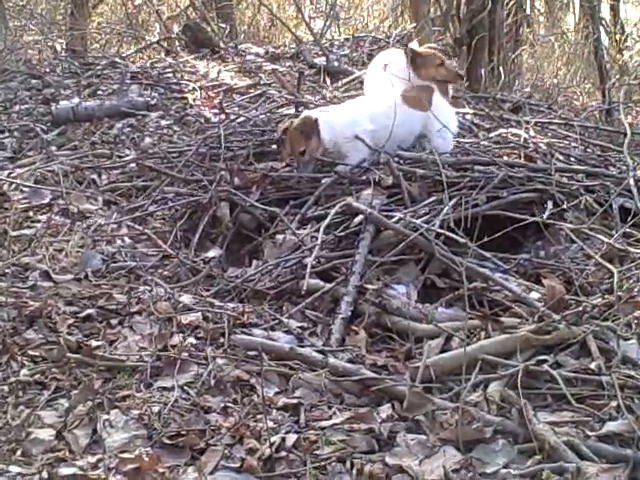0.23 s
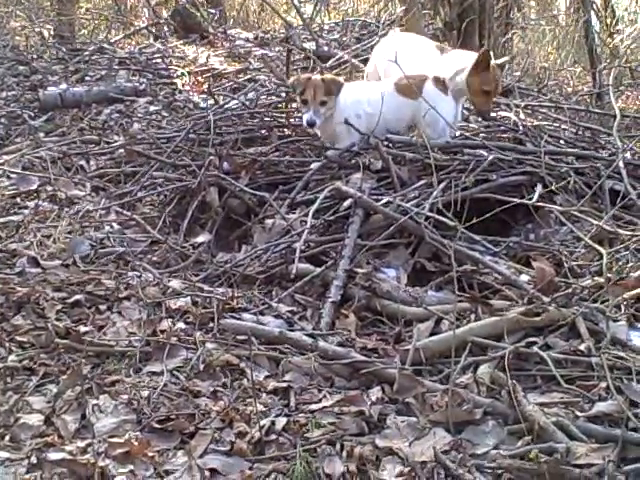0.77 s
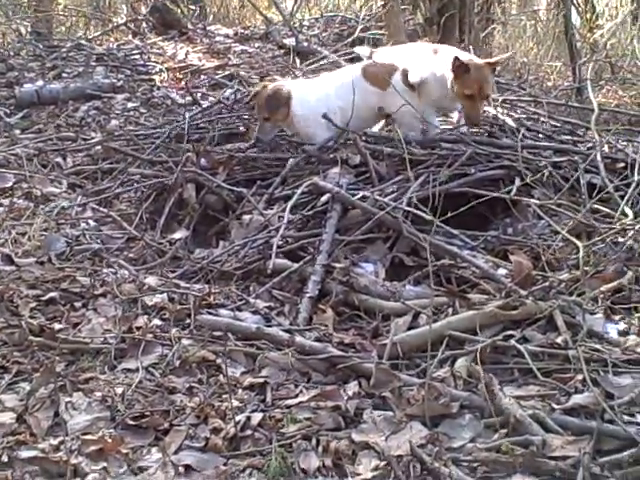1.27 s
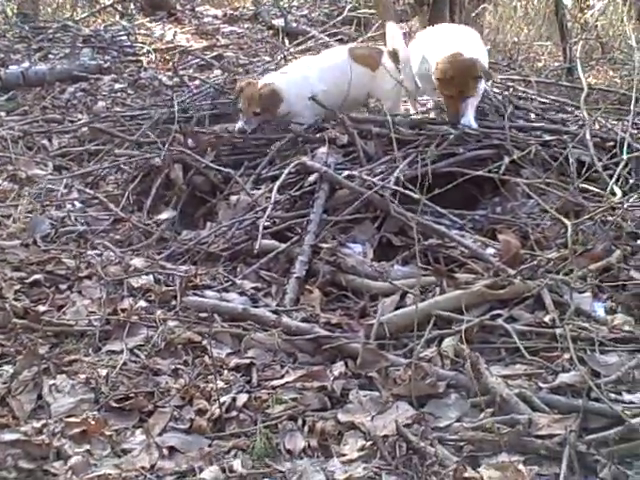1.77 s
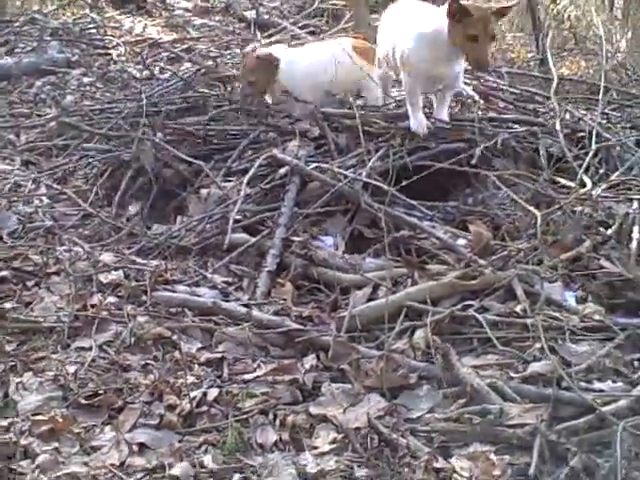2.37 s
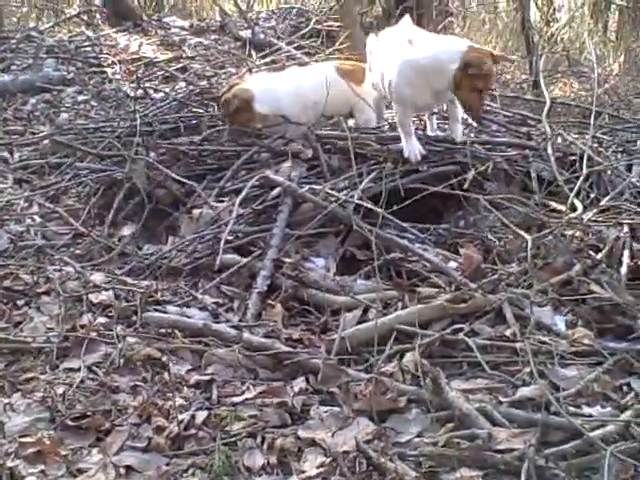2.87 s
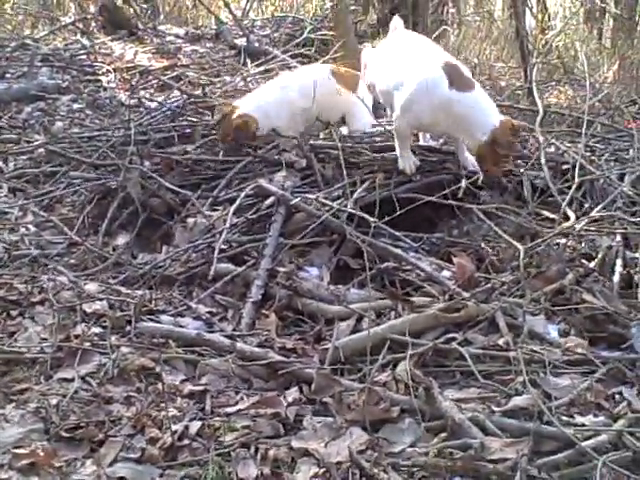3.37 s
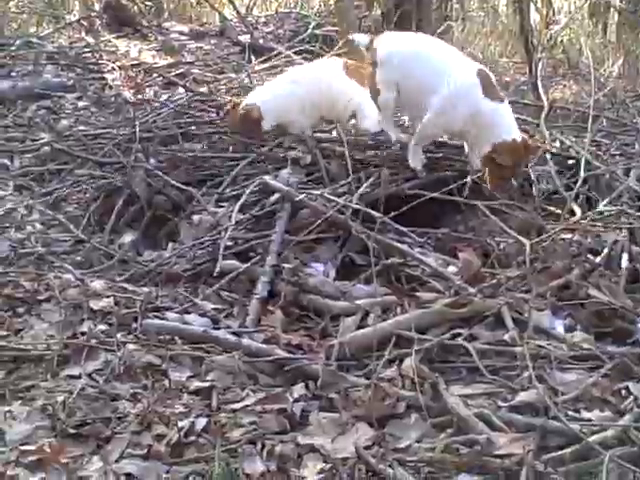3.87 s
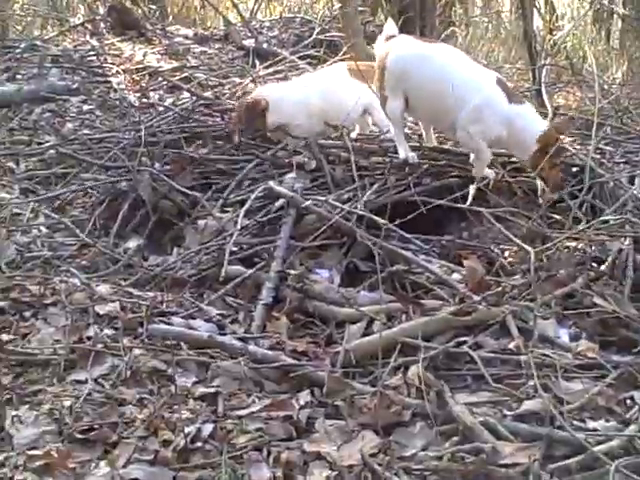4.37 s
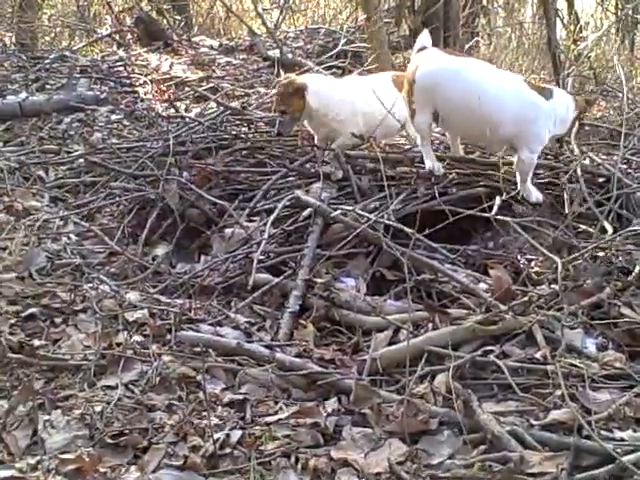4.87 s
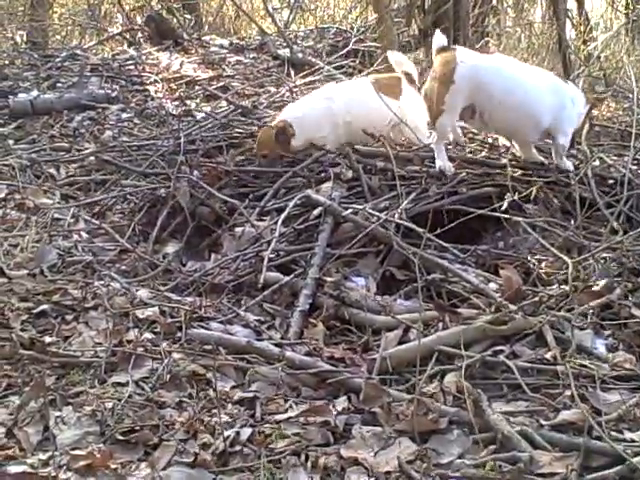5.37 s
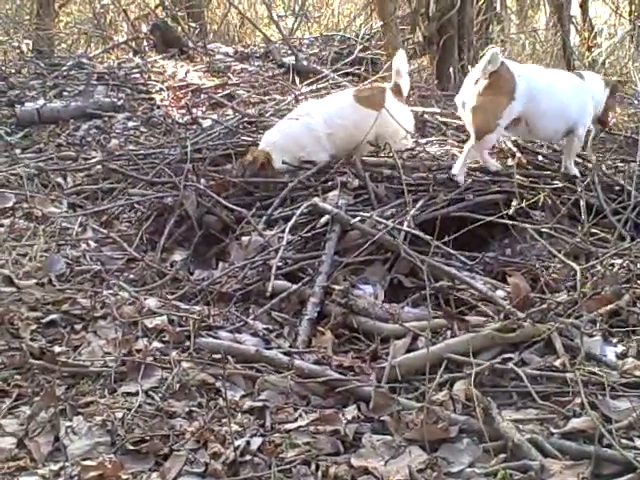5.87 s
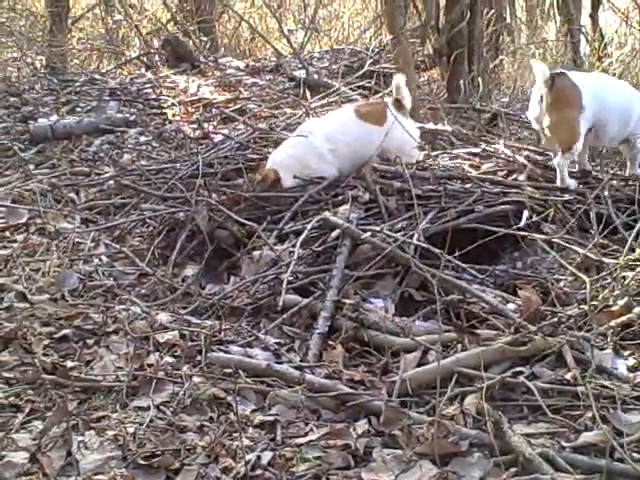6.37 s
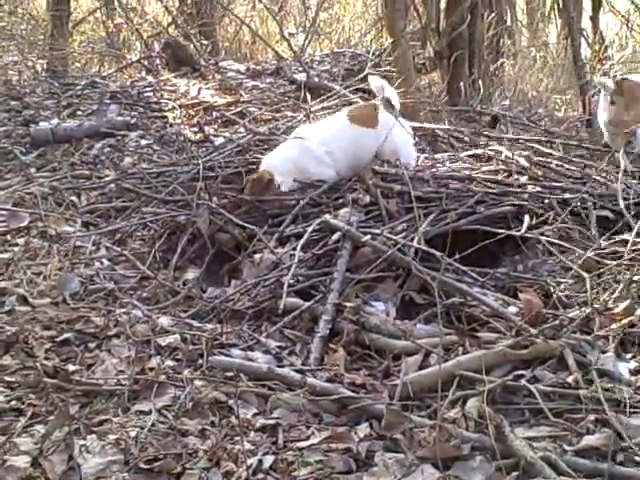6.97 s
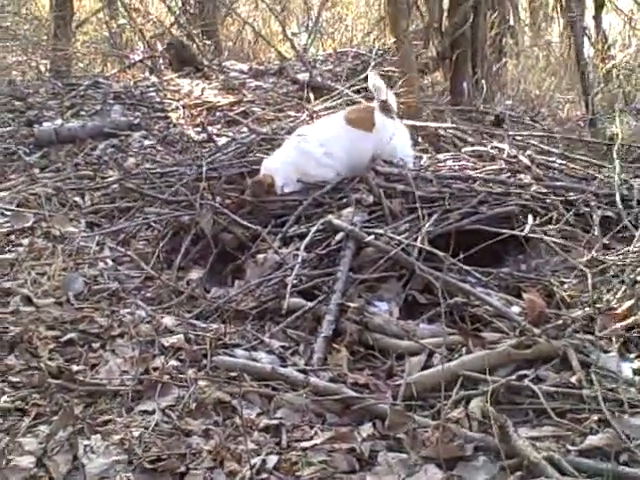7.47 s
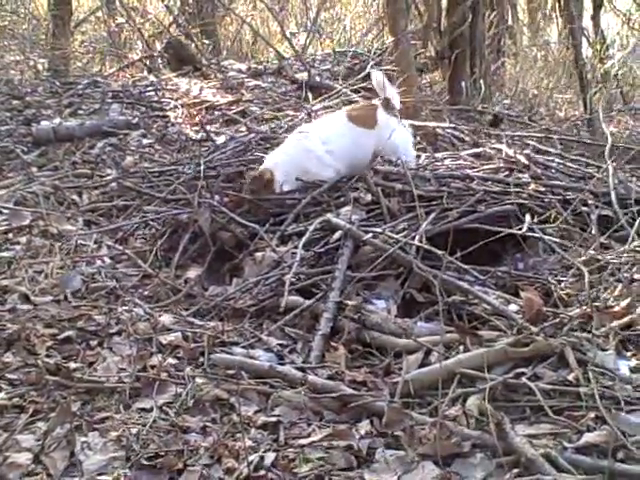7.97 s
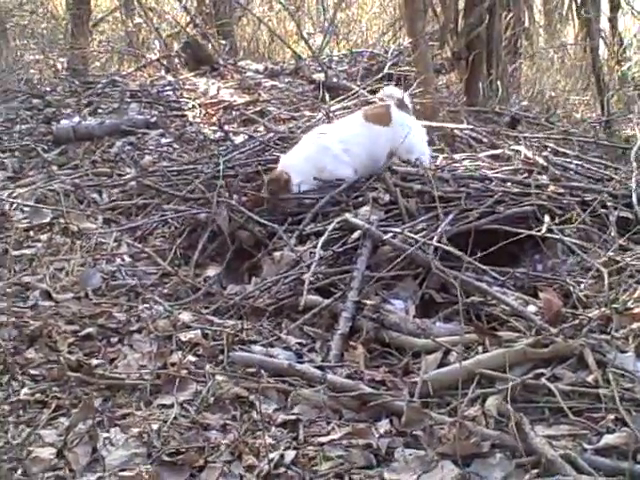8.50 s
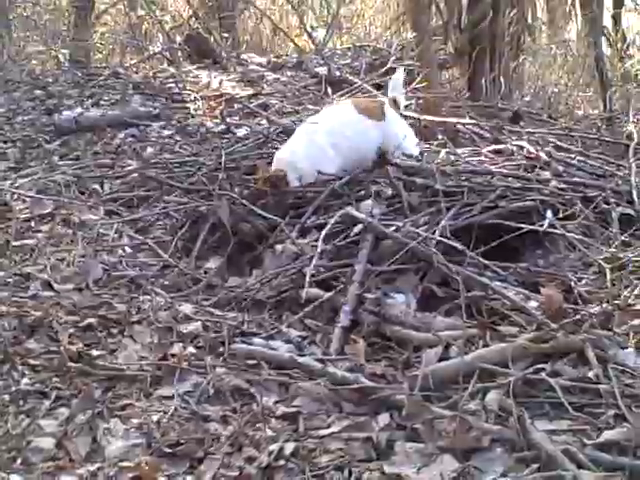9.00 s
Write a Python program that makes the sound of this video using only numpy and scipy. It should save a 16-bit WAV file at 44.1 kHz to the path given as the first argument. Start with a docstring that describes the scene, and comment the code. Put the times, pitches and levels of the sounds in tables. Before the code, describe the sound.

Dry leaves crunch and brittle twigs snap in uneven bursts as two dogs move over a woodland brush pile, above a faint distant rumble.

```python
"""In open woodland, two small dogs nose and tread through a brush pile of dry twigs and leaves.
Under their weight, leaves and stems crumple in dense tiny fractures, each a decaying burst of noise.
Twigs snap and ring briefly; thicker sticks knock in heavily damped modes. A far rumble, wavering
hums and a faint hiss lie below. A small microphone with a strong treble resonance hears it from a
few metres."""
import sys
import numpy as np
from scipy import signal
from scipy.fft import rfft, irfft
from scipy.io import wavfile
from scipy.ndimage import uniform_filter1d

SR = 44100
rng = np.random.default_rng(int(sys.argv[2]) if len(sys.argv) > 2 else 0)


def store_pcm(level_fs):
    """Save levels as 16-bit WAV."""
    pcm = np.round(np.clip(level_fs, -1, 1) * 32767).astype(np.int16)
    wavfile.write(sys.argv[1], SR, np.atleast_2d(pcm).T)


N = 407484

# Steady rustle of the leaves as both dogs shift about: t/s, level/dB
STEADY_RUSTLE = [(0.0, -32.5), (0.22, -51.5), (0.4, -44), (0.75, -46.5), (1.0, -37.5), (1.9, -43.5),
                 (2.05, -57), (2.35, -36), (2.55, -51), (2.96, -59), (3.15, -51.5), (3.4, -37), (3.85, -43),
                 (4.22, -52.5), (4.45, -44.5), (4.8, -52.5), (5.8, -36), (6.13, -42.5), (6.6, -33.5),
                 (7.36, -35.5), (7.56, -44), (8.45, -46.5), (8.9, -37.5), (9.06, -44.5), (9.24, -34)]
# A paw or nose presses into the litter: t/s at fullest weight, level/dB, press time/s, ease time/s
PAW_PRESSES = [(0.0, -29.5, 0.044, 0.036), (0.377, -29.5, 0.054, 0.086), (0.507, -33.5, 0.04, 0.034),
               (0.62, -38.5, .06, 0.13), (0.804, -38.5, 0.039, .12), (1.051, -42, 0.13, 0.039),
               (1.137, -32.5, 0.031, 0.073), (1.26, -29, 0.03, 0.031), (1.45, -25.5, 0.057, 0.14),
               (1.6, -31.5, 0.1, 0.094), (1.763, -28, 0.11, 0.078), (1.941, -33.5, 0.033, .05),
               (2.004, -29, 0.019, 0.021), (2.115, -27, 0.021, .05), (2.189, -19.5, 0.053, 0.068),
               (2.691, -40, 0.07, 0.056), (2.888, -45.5, 0.063, .03), (3.413, -38, 0.14, .025),
               (3.545, -31, 0.036, 0.2), (3.688, -29, 0.1, 0.092), (3.78, -32.5, .05, .045),
               (3.897, -23, 0.032, 0.023), (4.007, -35.5, 0.042, 0.04), (4.141, -36, 0.054, 0.047),
               (4.258, -34, 0.011, 0.38), (4.52, -24, 0.037, 0.084), (4.6, -28, 0.07, 0.038),
               (4.684, -26.5, .06, 0.037), (4.908, -40, 0.039, 0.085), (5.02, -33.5, 0.012, 0.096),
               (5.221, -39, 0.037, .07), (5.304, -33.5, .045, 0.16), (5.555, -27.5, 0.031, 0.049),
               (5.63, -26.5, 0.032, 0.035), (5.767, -29, 0.035, 0.031), (5.996, -34, 0.029, 0.034),
               (6.067, -40, 0.043, 0.065), (6.179, -31.5, 0.03, 0.05), (6.269, -33.5, 0.023, 0.021),
               (6.328, -32, 0.017, 0.084), (6.688, -24.5, 0.12, 0.059), (6.746, -31.5, 0.044, 0.023),
               (6.963, -28.5, 0.094, 0.12), (7.175, -27.5, 0.022, 0.043), (7.629, -32, 0.025, 0.037),
               (7.715, -37.5, 0.038, 0.11), (8.002, -34.5, .045, .1), (8.098, -38.5, .05, .08),
               (8.185, -35, 0.068, 0.063), (8.39, -43.5, 0.062, 0.043), (8.565, -40.5, 0.041, 0.032),
               (8.663, -47, 0.059, .1), (8.785, -30, 0.058, 0.12), (8.918, -35, 0.086, 0.073),
               (9.109, -33.5, 0.021, 0.17)]
def treading_db():
    """Incoherent sources add in power: each tread swells and eases exponentially over a steady rustle."""
    t = np.arange(N) / SR
    fall_db = 10   # over one press or ease time
    power = from_db(2 * in_time(STEADY_RUSTLE)[0])
    for peak_s, db, press_s, ease_s in PAW_PRESSES:
        from_peak = np.maximum((t - peak_s) / ease_s, (peak_s - t) / press_s)
        power += from_db(2 * (db - fall_db * from_peak))
    return 10 * np.log10(power)


def fractures(per_s, spread_db, clump_db, t60):
    """Shot process: cracks of uneven size come in random clumps; their decaying powers sum to an envelope."""
    onsets = rng.random(N) < per_s * from_db(clump_db * drift(40)) / SR
    size_db = spread_db * np.minimum(rng.exponential(1, N), 4.5)
    power = onsets * from_db(2 * size_db)
    decay = from_db(-120 / (t60 * SR))
    return np.sqrt(signal.lfilter([1], [1, -decay], power + 1e-18))


# Spectra of fracture in thin leaves and in stiffer stems: f/Hz, relative level/dB
LEAF_SPECTRUM = [(1500, -24.5), (3000, -10.5), (4000, -3.5), (6000, -0.5), (9000, 3.5)]
STEM_SPECTRUM = [(250, -28), (500, -6.5), (1000, -7), (2000, -2), (3200, -1.5), (5000, -11.5),
                 (9000, -31.5)]
# Drift of the stems about their usual share of the rustle: t/s, relative level/dB
STEM_BALANCE = [(0.0, 0.5), (0.9, 1), (1.3, -0.5), (1.9, 0.5), (2.2, -1), (2.55, 1.5), (3.4, -0.5),
                (4.0, -1.5), (4.3, -0.5), (4.7, -0.5), (5.8, 0.5), (6.2, -1), (7.0, -1), (7.2, 2),
                (7.55, -2), (8.0, 1.5), (8.2, 1.5), (8.55, -1.5), (9.24, 0)]
def litter():
    """Common excitation: the same fractures sound in leaves and stems; each also has some of its own."""
    usual_leaves_db, usual_stems_db, stems_follow = -37, -49, 0.93
    leaves_db = treading_db()
    stems_db = usual_stems_db + stems_follow * (leaves_db - usual_leaves_db) + in_time(STEM_BALANCE)[0]
    ticks = fractures(per_s=90, spread_db=3.0, clump_db=3.0, t60=0.006)
    shared = fractures(per_s=900, spread_db=3.5, clump_db=5.5, t60=0.029) + 1.95 * ticks
    in_leaves = fractures(per_s=2100, spread_db=2.0, clump_db=1.0, t60=0.018)
    in_stems = fractures(per_s=2100, spread_db=2.0, clump_db=1.0, t60=0.018)
    leaves = colour(evened(shared + 0.59 * in_leaves) * rng.standard_normal(N), LEAF_SPECTRUM)
    stems = colour(evened(shared + 0.72 * in_stems) * rng.standard_normal(N), STEM_SPECTRUM)
    return from_db(leaves_db) * heard_rms_one(leaves) + from_db(stems_db) * heard_rms_one(stems)


# Breaking twigs: t/s, peak level/dB of the crack, level/dB of the woody part re the crack, ring f/Hz
TWIG_SNAPS = [(0.2732, -14.5, -14, 6000), (0.329, -16, -10.5, 6000), (0.3872, -10.5, -17, 6000),
              (0.4124, -17, -14, 5870), (0.5159, -14.5, -14, 5100), (0.605, -20.5, -10, 4630),
              (0.9934, -14.5, -13.5, 5470), (1.107, -21, -17, 6000), (1.1607, -24, -15, 5500),
              (1.137, -21, -12, 6300), (1.3642, -16.5, -17, 6700), (1.4744, -12, -9, 6200),
              (1.5461, -15, -8, 7050), (1.6743, -8, -10.5, 6060), (1.749, -18, -3.5, 6620),
              (1.892, -20, -10.5, 6000), (1.939, -20, -18, 6000), (2.107, -13, -13, 6700),
              (2.6507, -27.5, -18, 4800), (3.1848, -28, -9, 3600), (3.43, -18, -12, 7100),
              (3.4865, -13.5, -18, 5860), (3.5664, -19, -15, 7200), (3.6847, -13, -10, 6900),
              (3.7198, -10.5, -15, 5900), (3.7862, -11, -16, 6070), (3.862, -19, -16, 7400),
              (3.9537, -18, -15, 5760), (3.9795, -25.5, -6, 6900), (4.248, -16, -11, 5200),
              (4.316, -16.5, -18, 5140), (4.4973, -15, -11, 6230), (4.508, 0.7, -13.5, 6740),
              (4.5338, -15, -12, 5500), (4.5598, -4, -12, 6270), (4.791, -27.5, -6, 6700),
              (5.007, -18.5, -14, 6000), (5.2161, -21, -12, 4700), (5.4293, -17.5, -12, 6400),
              (5.6456, -15.5, -8.5, 6000), (5.7827, -18.5, -14, 5900), (5.8249, -13.5, -20, 6360),
              (5.8473, -19, -18, 6430), (5.9385, -20.5, -11, 6600), (6.072, -13.5, -9.5, 5700),
              (6.1623, -19.5, -12, 6060), (6.1837, -12, -19, 6100), (6.2038, -2, -18.5, 5600),
              (6.283, -19, -17, 5740), (6.3184, -14, -9.5, 5600), (6.3682, -14, -11, 6170),
              (6.394, -11.5, -13.5, 6200), (6.437, -24, -10, 6500), (6.467, -10, -11.5, 5960),
              (6.478, -13.5, -18, 6200), (6.5885, -17, -10.5, 7300), (6.6152, -16.5, -6.5, 6050),
              (6.7546, -12.5, -18.5, 4870), (6.8537, -11, -15, 6400), (6.896, -18, -11, 4950),
              (7.0504, -14.5, -13, 6540), (7.1469, -13.5, -12, 6950), (7.6023, -12, -13, 5400),
              (7.7112, -19.5, -12, 6200), (7.797, -12.5, -12, 6860), (7.9831, -21.5, 1, 5950),
              (8.2494, -23.5, -7, 5200), (8.2792, -19, -16, 6100), (8.324, -29, -7, 6200),
              (8.433, -22.5, -9.5, 4560), (8.47, -27, -18.5, 5950), (8.792, -19, -16, 5960),
              (8.9185, -14, -13, 6700), (9.0915, -24, -10, 7000), (9.0995, -9.5, -12, 4100),
              (9.177, -17.5, -10, 6200)]
def twigs():
    """Brittle fracture: a brief tear excites the twig's resonance and leaves a weak scattered tail."""
    onset_s, crack_db, wood_db, ring_hz = np.transpose(TWIG_SNAPS)[:, :, None]
    t = np.arange(3000) / SR
    tear_s = 0.00025 + 0.0021 * from_db(crack_db)   # thicker, louder twigs tear for longer
    break_t60, tail_t60 = 0.0068, 0.06
    tail = from_db(-18 - 60 * t / tail_t60)
    envelope = from_db(-60 * np.maximum(t - tear_s, 0) / break_t60) + tail
    noise = rng.standard_normal((len(TWIG_SNAPS), 2, len(t)))
    burst = colour(envelope * noise[:, 0], LEAF_SPECTRUM)
    ring = np.array([resonate(row, hz, width_hz=700) for row, hz in zip(burst, ring_hz[:, 0])])
    crack = heard_peak_one(burst + from_db(11) * ring)
    wood = heard_peak_one(colour(envelope * noise[:, 1], STEM_SPECTRUM))
    return place(onset_s[:, 0], from_db(crack_db) * crack + from_db(crack_db + wood_db) * wood)


# Sticks knocking together: t/s, peak level/dB, f/Hz of the strongest mode
STICK_KNOCKS = [(1.67, -27, 920), (3.897, -29, 570), (4.508, -24, 810), (7.097, -22, 342),
                (7.161, -29, 666), (7.186, -22, 493), (7.197, -29, 760), (7.796, -34, 446),
                (7.983, -33, 673), (8.186, -29.5, 820), (8.245, -28, 482), (8.388, -28.5, 361),
                (9.098, -29.5, 408)]
def sticks():
    """Damped free vibration: a blow starts three inharmonic wood modes that die away as a dull knock."""
    onset_s, peak_db, hz = np.transpose(STICK_KNOCKS)[:, :, None]
    t = np.arange(2500) / SR
    modes = [(0.55, 0.5, 0.035), (1, 7, 0.03), (1.7, 5, 0.017)]   # f ratio, relative level/dB, T60/s
    ring = sum(from_db(db - 60 * t / t60) * np.sin(2 * np.pi * ratio * hz * t)
               for ratio, db, t60 in modes)
    return place(onset_s[:, 0], from_db(peak_db) * heard_peak_one(ring))


# Spectrum of the far rumble: f/Hz, relative level/dB
RUMBLE_SPECTRUM = [(12, -32.5), (20, -4), (60, 1), (113, -2.5), (167, -8.5), (270, -8), (350, -13),
                   (422, -20), (1200, -28.5), (1560, -58.5), (2640, -120)]
# Its slow rise and fall: t/s, level/dB
RUMBLE_SWELL = [(0.0, -41.5), (1.2, -41.5), (2.8, -42.5), (5.0, -43), (6.4, -40), (7.2, -42.5),
                (8.5, -41.5), (9.24, -40)]
def rumble():
    """Filtered noise: a far rumble with its power at low frequencies and a slowly changing level."""
    settled = colour(rng.standard_normal(N + SR), RUMBLE_SPECTRUM)[:, SR:]
    return from_db(in_time(RUMBLE_SWELL)[0]) * heard_rms_one(settled)


# Distant hums: f/Hz, bandwidth/Hz, level/dB
DISTANT_HUMS = [(218, 33, -58.5), (261.5, 24.6, -56), (327.7, 43, -55.5)]
def hums():
    """Narrow-band noise has a pitch; slow random amplitude modulation makes each hum waver."""
    waver_db, waver_hz = 2.5, 1.16
    total = np.zeros(N)
    for hz, width_hz, db in DISTANT_HUMS:
        gain = from_db(db + waver_db * drift(waver_hz))
        total += gain * heard_rms_one(resonate(rng.standard_normal(N), hz, width_hz))
    return total


# Spectrum of the woodland's hiss: f/Hz, relative level/dB
HISS_SPECTRUM = [(500, -10), (1000, -5), (1300, -7.5), (1550, 0.5), (1900, -8.5), (3000, -16), (6000, -2),
                 (9000, -6)]
def hiss():
    """Stationary broadband noise: the faint, even hiss of the wood."""
    return from_db(-68) * heard_rms_one(colour(rng.standard_normal(N), HISS_SPECTRUM))


def from_db(db):
    """Amplitude ratio of a level: a factor of ten per 20 dB."""
    return 10 ** (np.asarray(db) / 20)


def in_time(rows):
    """Linear interpolation of a table's columns to every sample."""
    times, *columns = np.transpose(rows)
    return [np.interp(np.arange(N) / SR, times, column) for column in columns]


def colour(x, spectrum):
    """Minimum-phase filtering: folding the cepstrum gives a causal response with the given spectrum."""
    size = 8192
    hz, db = np.transpose(spectrum)
    grid_hz = np.maximum(np.arange(size // 2 + 1) * SR / size, 1)
    gain = from_db(np.interp(np.log(grid_hz), np.log(hz), db))
    cepstrum = irfft(np.log(gain))
    cepstrum[1:size // 2] *= 2
    cepstrum[size // 2 + 1:] = 0
    taps = irfft(np.exp(rfft(cepstrum)))
    return signal.fftconvolve(np.atleast_2d(x), taps[None], axes=-1)[:, :x.shape[-1]]


def resonate(x, hz, width_hz):
    """Two-pole resonance with unit gain at its peak."""
    r = np.exp(-np.pi * width_hz / SR)
    feedback = [1, -2 * r * np.cos(2 * np.pi * hz / SR), r * r]
    return signal.lfilter([(1 - r * r) / 2, 0, (r * r - 1) / 2], feedback, x)


def low_pass(x, hz):
    """Steep low-pass filter whose stop band, 80 dB down, begins at hz."""
    return signal.sosfilt(signal.cheby2(14, 80, hz, fs=SR, output="sos"), x)


def drift(hz):
    """Slow random fluctuation: twice low-passed noise with unit standard deviation."""
    r = np.exp(-2 * np.pi * hz / SR)
    slow = signal.lfilter([1], [1, -2 * r, r * r], rng.standard_normal(N + SR))[SR:]
    return slow / slow.std()


def evened(envelope):
    """Unit running rms, so paw pressure sets the energy, be it in few big cracks or many small ones."""
    return envelope / np.sqrt(uniform_filter1d(envelope ** 2, size=3500))


def heard_rms_one(x):
    """Normalisation to unit rms as weighted by the microphone."""
    return x / np.sqrt(np.mean(colour(x, MICROPHONE_RESPONSE) ** 2))


def heard_peak_one(rows):
    """Normalisation of each row to unit peak as weighted by the microphone."""
    return rows / np.abs(colour(rows, MICROPHONE_RESPONSE)).max(axis=1, keepdims=True)


def place(times, rows):
    """Delay and sum: each short sound starts at its own time."""
    track = np.zeros(N + rows.shape[1])
    for onset_s, row in zip(times, rows):
        start = round(onset_s * SR)
        track[start:start + len(row)] += row
    return track[:N]


def scene():
    """Superposition: the pressures of all sources add at one microphone."""
    return litter() + twigs() + sticks() + rumble() + hums() + hiss()


# Response of the capsule, with its treble resonance near 6 kHz: f/Hz, gain/dB
MICROPHONE_RESPONSE = [(20, 11.5), (2500, 2), (3600, 1), (5200, 5), (5900, 10), (6400, 10), (6900, 5.5),
                       (7500, 0), (8000, -10), (8500, -15), (9000, -21), (9300, -52)]
def record(dry):
    """Resonance and saturation: the capsule colours, the converter narrows, the loudest snaps clip."""
    narrow = low_pass(colour(dry, MICROPHONE_RESPONSE), hz=10200)
    clipped = np.clip(narrow, -0.75, 0.75)
    return low_pass(clipped, hz=16500)


dry = scene()
out = record(dry)
store_pcm(out)
```